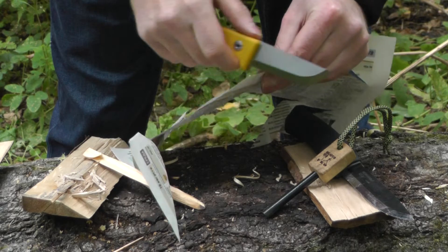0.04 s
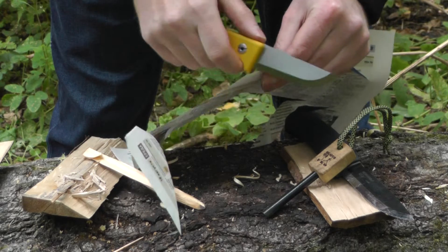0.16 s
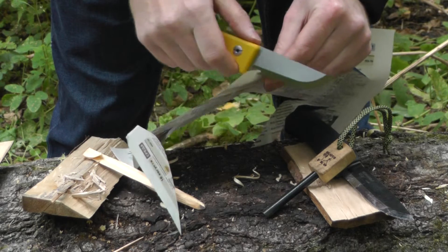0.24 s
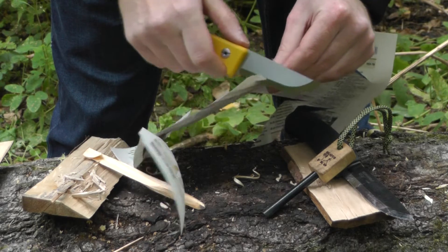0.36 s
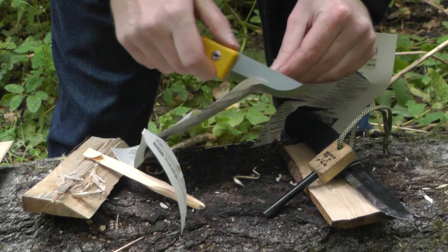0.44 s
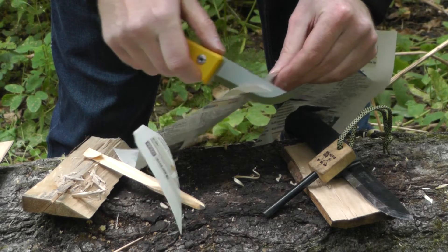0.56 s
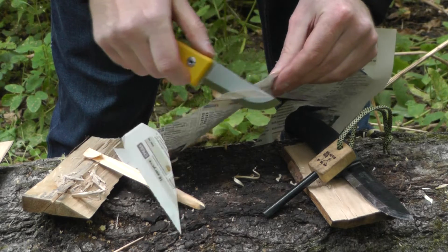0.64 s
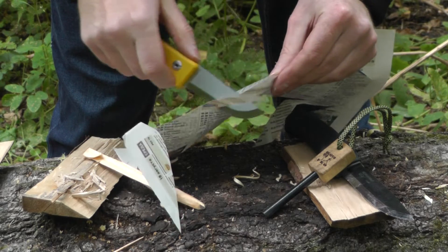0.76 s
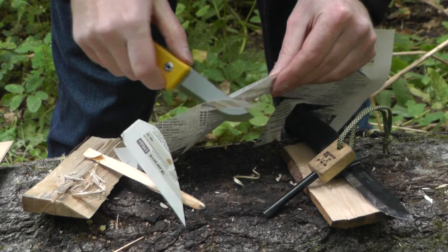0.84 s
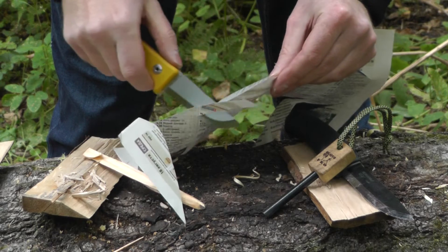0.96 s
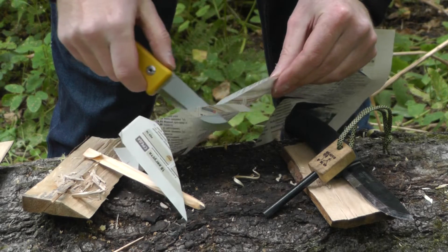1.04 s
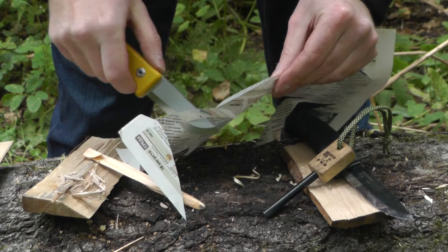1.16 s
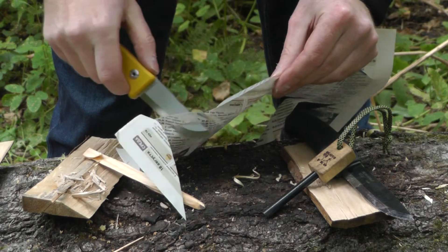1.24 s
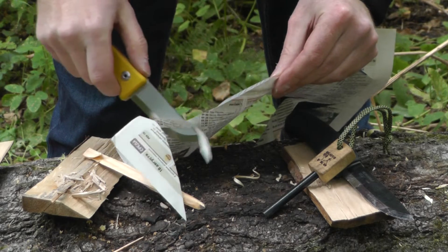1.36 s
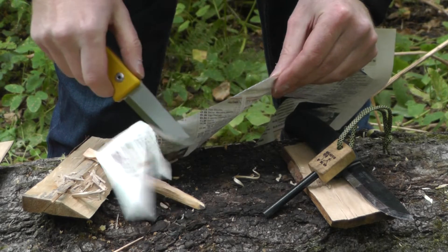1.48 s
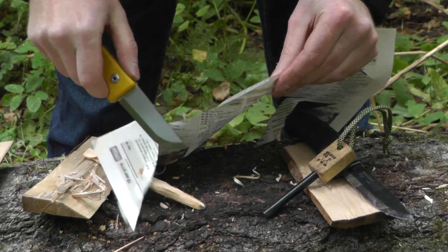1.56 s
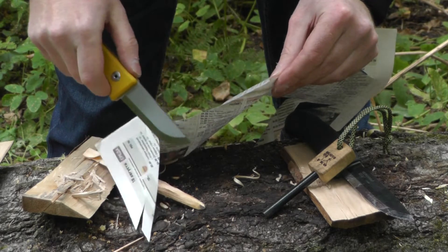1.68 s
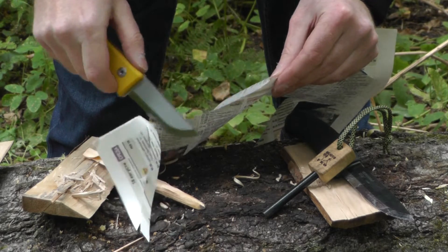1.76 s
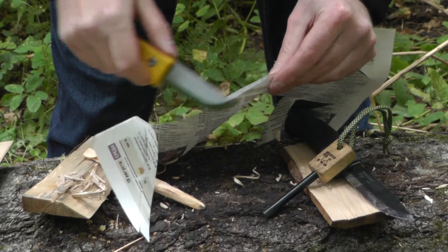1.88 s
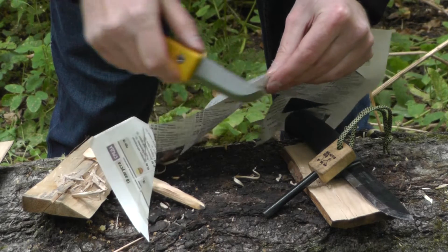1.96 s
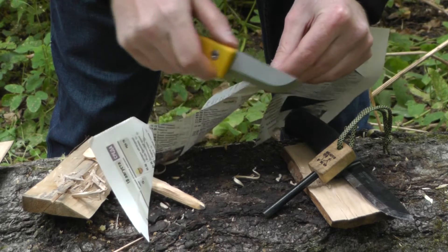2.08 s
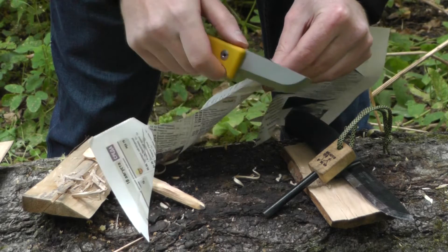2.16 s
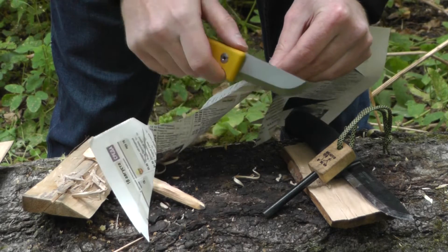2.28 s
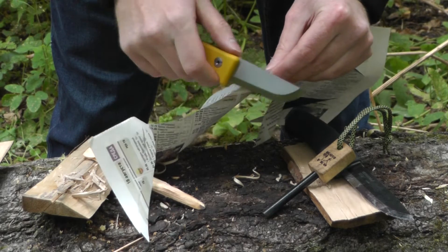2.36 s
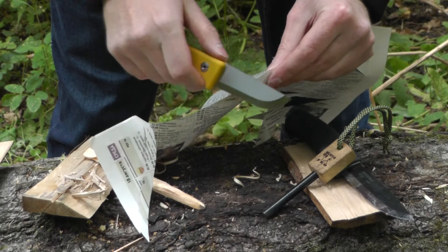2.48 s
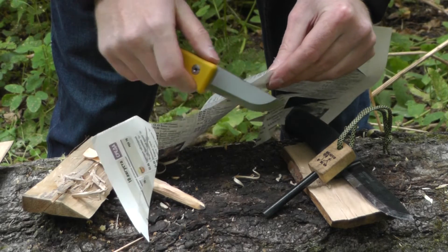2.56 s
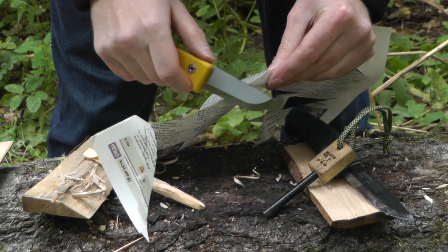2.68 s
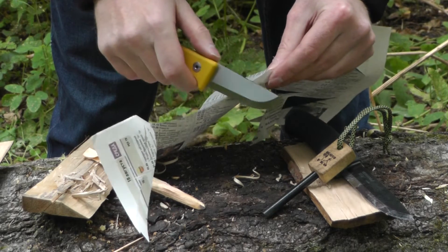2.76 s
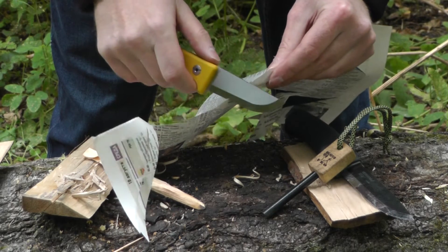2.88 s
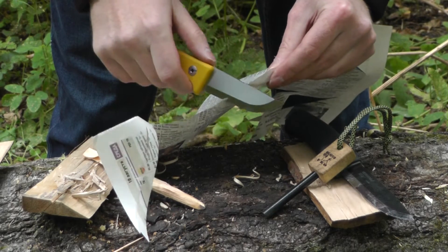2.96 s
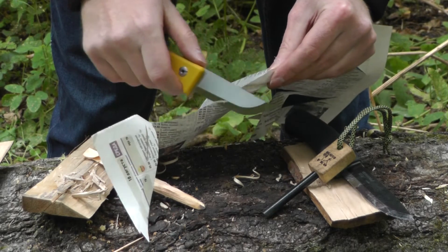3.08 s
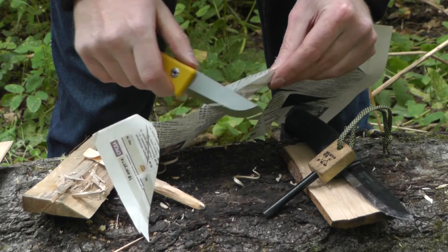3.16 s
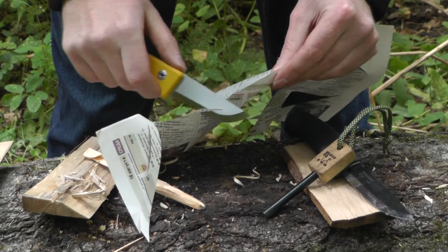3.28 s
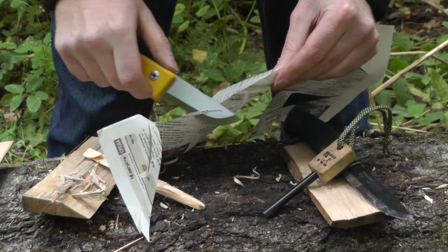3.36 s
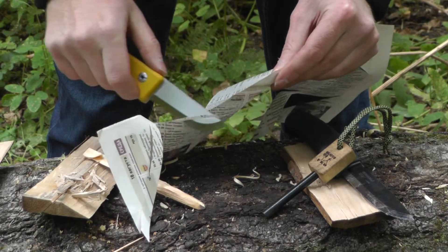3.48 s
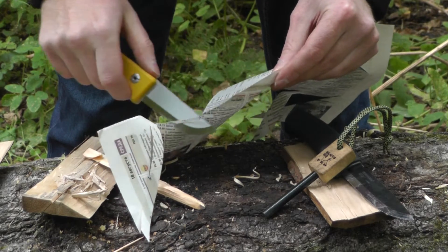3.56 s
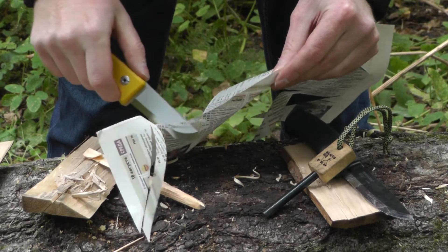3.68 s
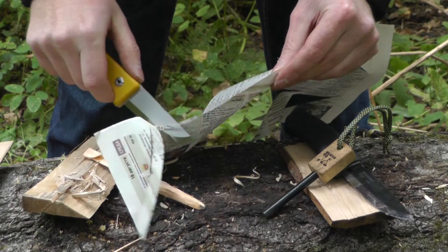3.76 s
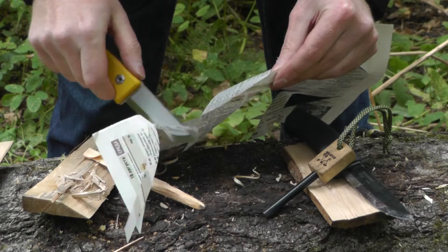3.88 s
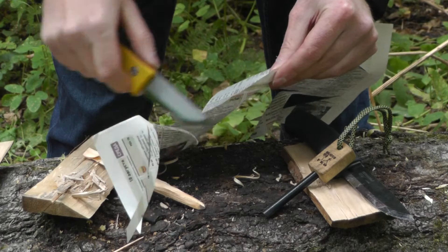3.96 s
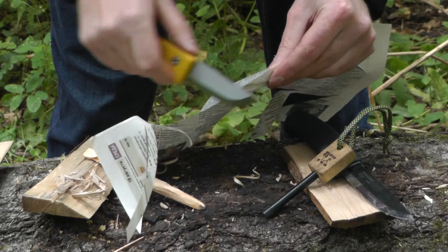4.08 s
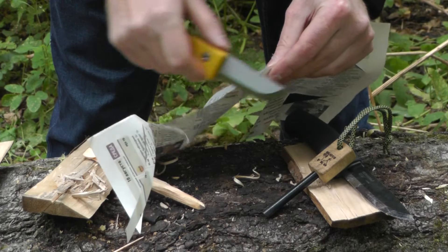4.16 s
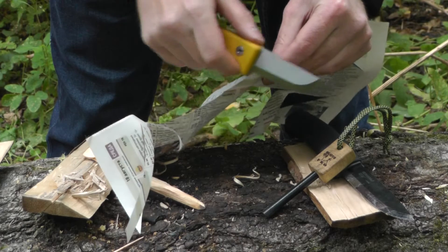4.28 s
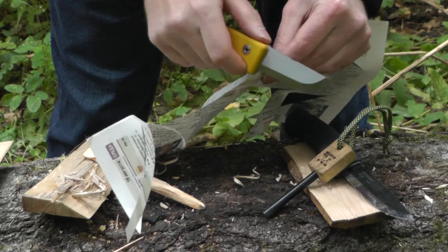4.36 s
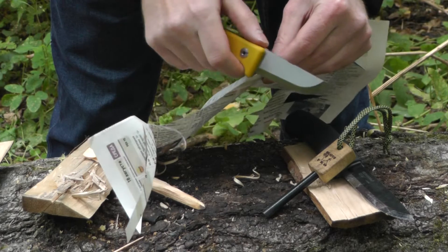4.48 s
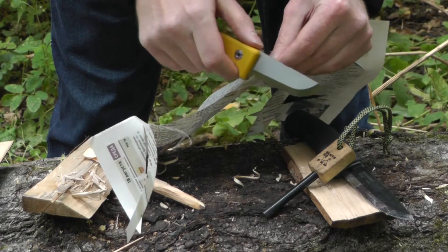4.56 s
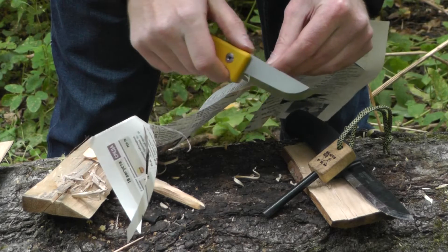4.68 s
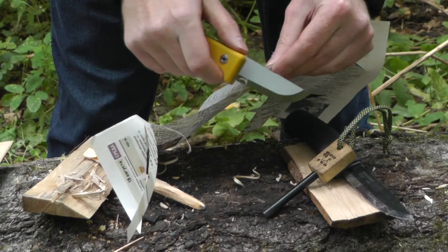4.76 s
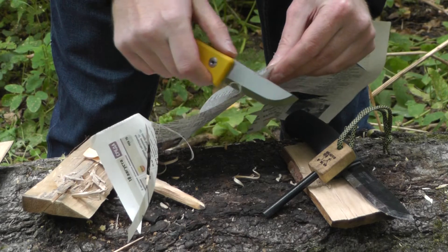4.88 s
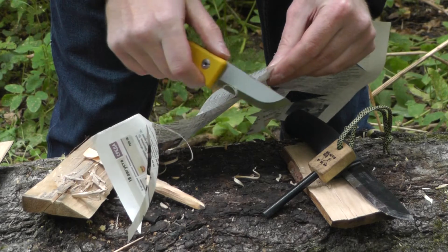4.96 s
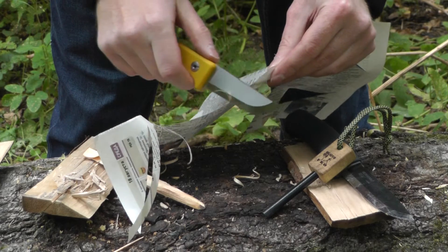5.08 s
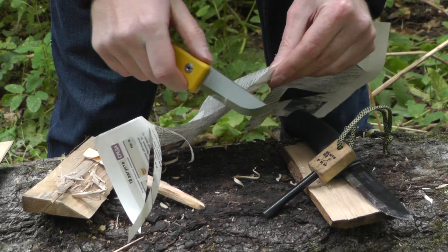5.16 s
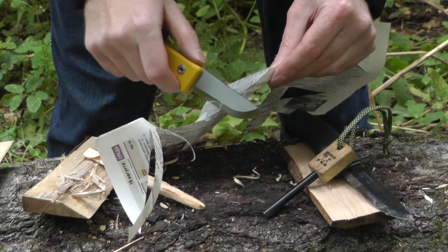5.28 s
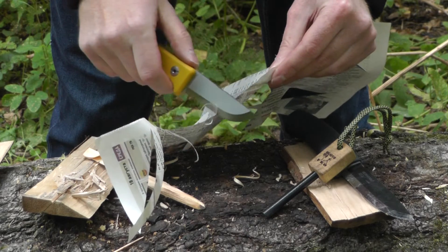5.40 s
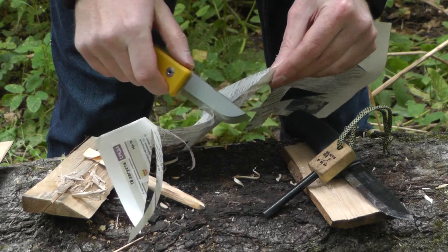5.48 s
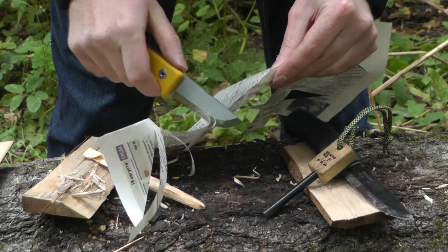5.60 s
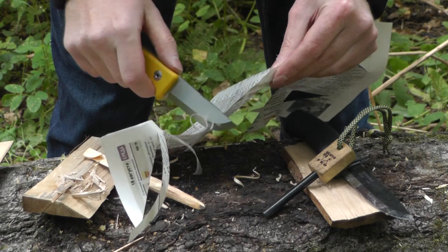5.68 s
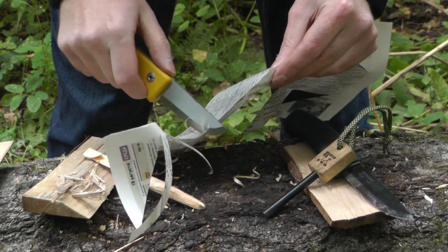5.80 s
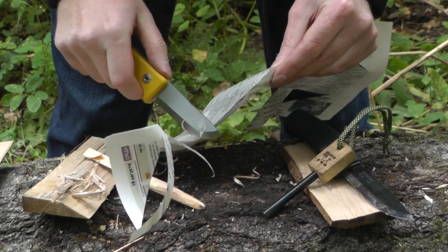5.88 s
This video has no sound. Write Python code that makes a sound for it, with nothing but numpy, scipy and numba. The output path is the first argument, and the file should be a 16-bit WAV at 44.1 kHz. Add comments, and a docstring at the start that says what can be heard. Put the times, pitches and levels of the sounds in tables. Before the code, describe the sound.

Quiet woodland air, a soft even low rush with a barely audible hum, runs throughout. Close and dry, a knife begins slicing a held sheet of newsprint at about 0.25 s: a thin, fine hiss grows into a fuller, grainy rasp, its hollow colouring sweeping upward, with snaps near 0.9 s and a crackling rip from 1.3 to 1.6 s. Faint crinkles and rustling follow as the knife returns. A short rip catches at 2.6 s, then a dry buckling tick at 2.85 s. The second stroke, 2.9 to 3.9 s, starts promptly and swells faster, with a strong rip at 3.5 s and a cluster of crisp snaps around 3.8 s. Light creasing and rustle fill the gap until 4.4 s. The third stroke fades in slowly, softer, finer and more hissy, with slight surges at 5.1 and 5.6 s, continuing to the end around 6 s.

```python
"""Knife slicing newsprint

A sharp knife slices strips off a hand-held sheet above a log, in quiet woodland. Random fibre breaks
excite the sheet's resonances, fuller as the cut leaves the fingers; delayed paths that shorten as the
blade sinks sweep a comb upward. Single snaps are impulse responses; crinkles and a faint rustle are
coloured bursts of breaks, and one buckle ticks. The air is filtered noise with a faint, wavering hum."""
import sys
import numpy as np
from scipy import signal
from scipy.fft import rfft, irfft, next_fast_len
from scipy.io import wavfile
from scipy.ndimage import uniform_filter1d
from numba import njit

SR = 44100
rng = np.random.default_rng(int(sys.argv[2]) if len(sys.argv) > 2 else 0)


def log_audio(samples):
    """Write samples as a 16-bit WAV file to the path given in sys.argv[1]."""
    # one column per channel
    frames = np.atleast_2d(samples).T
    # limit to full scale, then quantise
    limited = np.clip(frames, -1, 1)
    pcm = np.round(limited * 32767).astype(np.int16)
    wavfile.write(sys.argv[1], SR, pcm)


N = 261505
TIME = np.arange(N) / SR


def undb(db):
    """Logarithmic level: decibels to amplitude gain."""
    return 10 ** (np.asarray(db) / 20)


def unit(x):
    """Normalisation of a signal to rms 1."""
    return x / np.sqrt(np.mean(x ** 2) + 1e-18)


def colour(x, points):
    """Minimum-phase filtering: the cepstrum is folded to give a causal response with levels (f/Hz, level/dB)."""
    size = 4096
    hz, db = np.transpose(points)
    log_hz = np.log(np.fft.rfftfreq(size, 1 / SR) + 1)
    log_gain = np.log(undb(np.interp(log_hz, np.log(hz), db)))
    cepstrum = irfft(log_gain)
    cepstrum[1:size // 2] *= 2
    cepstrum[size // 2 + 1:] = 0
    response = irfft(np.exp(rfft(cepstrum)))
    return signal.fftconvolve(x, response)[:len(x)]


def ring(x, hz, width):
    """Simple resonance: one mode with gain 1 at its centre, width in Hz."""
    return signal.lfilter(*signal.iirpeak(hz, hz / width, fs=SR), x)


@njit
def glide_ring(x, hz, width):
    """Time-varying resonance: a state-variable mode whose centre moves from sample to sample."""
    y, band, low = np.empty(len(x)), 0., 0.
    for i in range(len(x)):
        g, k = np.tan(np.pi * hz[i] / SR), width / hz[i]
        v = (band + g * (x[i] - low)) / (1 + g * (g + k))
        band, low, y[i] = 2 * v - band, low + 2 * g * v, k * v
    return y


def below(x, hz):
    """Zero-phase low-pass filtering: the part of x under hz, in phase with x."""
    return signal.sosfiltfilt(signal.butter(3, hz, fs=SR, output="sos"), x)


def walk(rate, size=8192):
    """Slow random modulation: Gaussian levels drawn rate times a second, joined by slopes; rms 1."""
    k = max(int(SR / rate), 2)
    held = rng.standard_normal(size)[np.arange(N) // k % size]
    return unit(uniform_filter1d(held, k))


def stick_slip(rate, even_s=0.02):
    """Stick-slip friction: quick swings of the cutting force about a steady local average."""
    force = walk(rate)
    return unit(force - uniform_filter1d(force, int(even_s * SR)))


def fibres(rate, spread_db, bunch_db, bunch_rate):
    """Random impulsive excitation: breaks of either sign vary with toughness and with the edge's slip."""
    breaks = rng.random(N) < rate / SR
    toughness = np.minimum(rng.exponential(size=N), 4.5)
    catch = np.minimum(stick_slip(bunch_rate), 1.7)
    strength = undb(spread_db * toughness + bunch_db * catch)
    return unit(breaks * rng.choice([-1, 1], N) * strength)


def impulse(size=1024):
    """Impulsive excitation: one single-sample push."""
    return signal.unit_impulse(size)


def envelope(start, end, attack, release):
    """Amplitude envelope: linear rise, hold and fall to silence, in seconds."""
    return np.clip(np.minimum((TIME - start) / attack, (end - TIME) / release), 0, 1)


def add(out, s, sound):
    """Superposition: mix a sound in at time s."""
    i = int(s * SR)
    out[i:i + len(sound)] += sound[:N - i]


# Relative spectrum of the woodland air: f/Hz, level/dB
AIR_SPECTRUM = [(20, -24.5), (65, -12), (120, -11), (180, -11), (300, -9), (450, -5.5), (650, -2.5),
                (930, -7), (1250, -16), (1770, -22.5), (2300, -25), (3700, -28.5), (7000, -34.5),
                (15800, -38)]
AIR_DB = -49
HUM_HZ, HUM_DB = 250, -68.5


def woodland():
    """Broadband noise and frequency modulation: an even rush of distant air with a wavering hum in it."""
    rush = unit(colour(rng.standard_normal(N), AIR_SPECTRUM)) * undb(AIR_DB + 0.25 * walk(3.73))
    hum_hz = HUM_HZ * (1 + 0.0067 * walk(7.6))
    hum = np.sin(2 * np.pi * np.cumsum(hum_hz) / SR)
    return rush + undb(HUM_DB) * unit(hum)


# Flurries of creases as the sheet crinkles and scuffs:
# t/s, level/dB, length/s, ring f/Hz, ring level relative to the creases/dB
CRINKLE_EVENTS = [(0.152, -64, 0.062, 7600, 19), (1.57, -50.5, 0.077, 2670, -10),
                  (1.619, -57, 0.036, 2600, -15), (1.811, -46, 0.016, 6200, -9),
                  (1.932, -55, 0.12, 2300, -27), (1.983, -46, 0.019, 2010, -20),
                  (2.204, -56.5, 0.066, 5700, -24), (2.26, -53, 0.028, 5700, -19),
                  (2.445, -46.5, 0.0027, 4170, -14), (2.6, -48, 0.012, 2660, -10),
                  (2.753, -47.5, 0.027, 2130, -8), (2.869, -54, 0.017, 2420, -8),
                  (4.147, -60, 0.06, 3740, -1), (4.234, -45.5, 0.022, 2600, -30),
                  (4.291, -50.5, 0.02, 3720, -8), (4.311, -48.5, 0.032, 2030, -11),
                  (4.572, -47, 0.072, 1910, 23), (4.606, -49.5, 0.096, 8500, 3)]
# Relative spectrum of creasing paper, shared with the rustle: f/Hz, level/dB
CREASE_SPECTRUM = [(400, -8), (1300, -9), (2000, 5), (2750, 4.5), (3300, 1.5), (4300, 4), (5400, -4),
                   (6500, -4.5), (10000, -10.5), (12000, -14.5), (16000, -18)]


def crinkles(ring_width_hz=380):
    """Buckling cascades: short flurries of creases, each exciting a resonance of its own."""
    out = np.zeros(N)
    breaks = fibres(rate=1600, spread_db=1.5, bunch_db=2.5, bunch_rate=300)
    creases = colour(breaks, CREASE_SPECTRUM)
    for s, db, length, hz, ring_db in CRINKLE_EVENTS:
        start, count = int(s * SR), max(int(length * SR), 64)
        flurry = creases[start:start + count]
        flurry = unit(flurry) + undb(ring_db) * unit(ring(flurry, hz, ring_width_hz))
        rise = np.minimum(np.arange(count) / 30, 1)
        fall = np.cos(np.linspace(0, np.pi / 2, count)) ** .5
        add(out, s, undb(db) * unit(flurry * rise * fall))
    return out


# Knife strokes; depth runs from 0 at the fingers to 1 at the foot of the sheet:
# start t/s, end t/s, attack/s, starting level/dB, swell over the stroke/dB, edge hiss offset/dB,
# wait from the stroke's start until the blade sinks/s, sinking speed/(depth/s),
# added slackness (scale 0-1), strip ring offset/dB, finest hiss offset/dB, far path's delay at depth 0/ms
KNIFE_STROKES = [(0.24, 1.519, 0.35, -41.5, 8.5, .5, 0.32, 0.77, 0.05, -2, 0.5, 0.571),
                 (2.908, 3.888, 0.056, -40.5, 8.5, .5, 0.19, 1.17, 0.09, -0.5, -9, 0.644),
                 (4.424, 6.001, 0.87, -43.5, 1.5, -2.5, 0.1, .26, -.1, 2, 6.5, 0.538)]


def blade():
    """Kinematics: the edge bites gradually; after a wait from the stroke's start it sinks at constant speed."""
    depth, bite = np.zeros(N), np.ones(N)
    grip = np.tile(KNIFE_STROKES[0][8:], (N, 1))  # each stroke has its own grip on the sheet
    for stroke in KNIFE_STROKES:
        (start, end, attack), (wait, speed) = stroke[:3], stroke[6:8]
        cutting = (TIME >= start) & (TIME < end)
        t = TIME[cutting] - start
        depth[cutting] = np.clip(speed * (t - wait), 0, 1)
        bite[cutting] = np.minimum(t / attack, 1) ** 2
        grip[cutting] = stroke[8:]
    return depth, bite, *grip.T


# Short rips as the blade catches: start t/s, end t/s, level/dB, edge hiss offset/dB
BLADE_CATCHES = [(0.255, 0.33, -46, 3.5), (0.874, 0.968, -40, 1.5), (1.528, 1.618, -36.5, 0.5),
                 (2.606, 2.725, -38, -2.5), (3.24, 3.395, -42, -3), (3.503, 3.53, -27, -2),
                 (3.762, 3.85, -30.5, -7), (4.502, 4.7, -53.5, 0), (5.08, 5.23, -45, -9),
                 (5.56, 5.63, -43, -1)]
STROKE_RELEASE_S = 0.034
CATCH_ATTACK_S, CATCH_RELEASE_S = .014, .032


def efforts():
    """Driving force: gain over time and hiss offset of each stroke and catch; strokes swell as the hand leans in."""
    for start, end, attack, db, swell_db, hiss_db, *_ in KNIFE_STROKES:
        progress = np.clip((TIME - start) / (end - start), 0, 1)
        yield envelope(start, end, attack, STROKE_RELEASE_S) * undb(db + swell_db * progress), hiss_db
    for start, end, db, hiss_db in BLADE_CATCHES:
        yield envelope(start, end, CATCH_ATTACK_S, CATCH_RELEASE_S) * undb(db), hiss_db


# The paper's answer against cut depth, before each stroke's offsets: depth (0-1), slackness (0-1),
# flexing level/dB, edge hiss level/dB, finest hiss level/dB, strip ring level/dB
PAPER_RESPONSE = [(0, 0.38, -10.5, -2.5, 12, -13), (.22, 0.16, -5.5, -1, 6.5, -14),
                  (.35, 0.55, -2, -4, -5, -16.5), (.55, 0.61, -2, -6, -8, -16),
                  (1, 0.68, -7.5, -12, 6, -10.5)]


def paper_at(depth):
    """Interpolated boundary conditions: slackness, flexing, edge hiss, finest hiss and strip ring at a depth."""
    depths, *columns = np.transpose(PAPER_RESPONSE)
    return [np.interp(depth, depths, column) for column in columns]


# Relative response of the sheet, taut near the fingers: f/Hz, level/dB
TAUT_RING = [(200, -32), (600, -9.5), (1100, 6), (1650, -12.5), (2500, 1.5), (3300, -5.5), (4250, 3),
             (4900, -7.5), (5500, -7.5), (6300, 2), (8000, -2.5), (9800, -0.5), (11800, -20),
             (16000, -33.5)]
# Relative response of the sheet hanging slack: f/Hz, level/dB
SLACK_RING = [(200, -43), (380, -20), (550, -5.5), (700, -1.5), (880, -2.5), (1500, 0), (2400, -3),
              (3300, -6), (3850, 0.5), (4400, -8.5), (5100, -12.5), (6500, -18.5), (10500, -7),
              (12200, -17.5)]
STRIP_WIDTH_HZ = 600  # of each of two resonators in cascade


def strip_band(push, hz):
    """Cascaded resonance: two equal gliding resonators leave one clear band."""
    once = glide_ring(push, hz, STRIP_WIDTH_HZ)
    return unit(glide_ring(once, hz, STRIP_WIDTH_HZ))


def sheet(push, slack, strip_hz, strip_db, overtone=1.915, overtone_db=-7):
    """Modal superposition: taut and slack responses blend; the strip adds a wandering band and its overtone."""
    broad = (1 - slack) * unit(colour(push, TAUT_RING)) + slack * unit(colour(push, SLACK_RING))
    strip = strip_band(push, strip_hz)
    upper = strip_band(push, overtone * strip_hz)
    return unit(broad + undb(strip_db) * (strip + undb(overtone_db) * upper))


def bending(x):
    """Modal fluctuation: as the sheet bends, its many resonances swell and fade independently."""
    for hz in np.arange(1500, 15000, 750):
        x = x + (undb(2.3 * walk(8)) - 1) * ring(x, hz, 250 + hz / 30)
    return x


# Two short sound paths round the sheet: delays at depth 0, shortening per unit depth, amplitude shares
NEAR_MS, NEAR_SHRINK_MS, FAR_SHRINK_MS = .405, .21, .17
NEAR_SHARE, FAR_SHARE = .44, .24
TREMOR_MS, TREMOR_PER_S = .009, 6


def detours(x, depth, bite, far_ms):
    """Comb interference: sound bent round the sheet arrives late and phase-turned; shrinking lags sweep it upward."""
    turn = np.exp(-1j * np.pi / 4)  # one eighth of a cycle
    bent = np.real(signal.hilbert(x, next_fast_len(N))[:N] * turn)
    tremor_ms = TREMOR_MS * walk(TREMOR_PER_S)  # the hands are never quite still
    near_ms = NEAR_MS - NEAR_SHRINK_MS * depth + tremor_ms
    far_lag_ms = far_ms - FAR_SHRINK_MS * depth + tremor_ms
    near = np.interp(TIME - near_ms / 1000, TIME, bent)
    far = np.interp(TIME - far_lag_ms / 1000, TIME, bent)
    return x + bite * (NEAR_SHARE * near + FAR_SHARE * far)


BRIGHTEST_TICK_HZ, TICK_SPREAD_DB = 10500, 3


def pinpricks(rate=90, hz=7500, width_hz=4500):
    """Sparse impulse excitation: now and then a stiff fibre parts on the edge with a tiny bright tick."""
    strength = undb(TICK_SPREAD_DB * np.minimum(rng.exponential(size=N), 3))
    ticks = (rng.random(N) < rate / SR) * strength
    bright = ring(ring(ticks, hz, width_hz), hz, 2 * width_hz)
    return unit(below(bright, BRIGHTEST_TICK_HZ))


# Wandering ring of the cut strip, one list per slice: t/s, f/Hz
STRIP_PITCH = [
    [(0.35, 2450), (0.564, 2760), (1.07, 1990), (1.5, 2440)],
    [(2.95, 2500), (3.108, 2400), (3.13, 2420), (3.35, 2560)],
    [(5.12, 2050), (5.218, 2380), (5.904, 2460), (5.93, 2470)],
]
UNBITTEN_RING_DB = -15  # offset to the strip's ring before the edge has bitten
JUDDER_DB, JUDDER_PER_S = .67, 130
TOUGHNESS_DB, TOUGHNESS_PER_S = .5, 35


def slicing():
    """Source-filter principle: one stream of fibre breaks drives the sheet's flexing, ring and edge hiss."""
    depth, bite, extra_slack, extra_ring_db, extra_fine_db, far_ms = blade()
    slack, flex_db, edge_db, fine_db, strip_db = paper_at(depth)
    strip_hz = np.interp(TIME, *np.transpose(np.vstack(STRIP_PITCH)))
    push = fibres(rate=6000, spread_db=2.0, bunch_db=-0.5, bunch_rate=290)
    push = push * undb(JUDDER_DB * stick_slip(JUDDER_PER_S))
    ring_db = strip_db + extra_ring_db + UNBITTEN_RING_DB * (1 - bite)
    ringing = sheet(push, np.clip(slack + extra_slack, 0, 1), strip_hz, ring_db)
    paper = detours(bending(ringing), depth, bite, far_ms)

    low, body, coarse = below(paper, 1900), below(paper, 5000), below(paper, 11000)
    treble = coarse - body + undb(fine_db + extra_fine_db) * (paper - coarse)
    # each band is held to an even strength over 60 ms before the efforts shape it
    span = int(.06 * SR)
    bands = (low, body - low, treble)
    flex, middle, hiss = (b / np.sqrt(uniform_filter1d(b ** 2, span) + 1e-12) for b in bands)
    hiss = hiss * undb(1.0 * stick_slip(190)) + undb(-7.5) * pinpricks()  # the edge bites unevenly

    # strokes and catches add in power
    body_power, hiss_power = 0, 0
    for gain, hiss_db in efforts():
        body_power = body_power + gain ** 2
        hiss_power = hiss_power + (gain * undb(hiss_db)) ** 2
    grain = undb(TOUGHNESS_DB * walk(TOUGHNESS_PER_S))  # the paper is not equally tough everywhere
    body_sound = np.sqrt(body_power) * (middle + undb(flex_db) * flex)
    hiss_sound = np.sqrt(hiss_power) * undb(edge_db) * hiss
    return grain * (body_sound + hiss_sound)


# Tough fibres and creases that give at once: t/s, peak-to-peak level/dB, crispness (gain near 6.3 kHz)/dB
SNAP_EVENTS = [(0.893, -10, 4), (0.904, -10, 3), (1.314, -11, 6), (1.449, -12, 3), (1.463, -12, 2),
               (1.524, -19, 9), (1.547, -11, 11), (1.553, -13, 11), (1.587, -13, -3), (1.815, -28, 0),
               (1.985, -24, -2), (2.623, -17, 5), (2.673, -14, -4), (3.01, -13, 9), (3.211, -16.5, 5),
               (3.511, -11, -7), (3.796, -11, 1), (3.822, -11.5, 3), (3.843, -13, 4), (3.855, -16, 3),
               (3.871, -17, 5), (3.88, -21, 4), (3.888, -23, 1), (4.232, -33, 3), (4.243, -29, 3)]


def snaps(shiver=0.14, shiver_s=0.0028, shiver_hz=5000):
    """Impulse response: a tough fibre gives way at once and the sheet shivers on briefly, lower down."""
    out = np.zeros(N)
    t = TIME[:len(impulse())]
    slack = paper_at(blade()[0])[0]
    for s, db, crisp_db in SNAP_EVENTS:
        shivering = below(rng.standard_normal(len(t)), shiver_hz) * np.exp(-t / shiver_s)
        push = impulse() + shiver * shivering
        push = push + (undb(crisp_db) - 1) * ring(push, 6300, 4900)
        snap = colour(push, SLACK_RING if slack[int(s * SR)] > .45 else TAUT_RING)
        add(out, s, snap * undb(db) / np.ptp(snap))
    return out


# Handling of the sheet while the knife is brought back: start t/s, end t/s, base level before fluctuation/dB
HANDLING_SPANS = [(1.625, 2.167, -60), (2.193, 2.513, -65), (2.72, 2.762, -52), (3.91, 4.467, -62)]
RUSTLE_SPREAD_DB, RUSTLES_PER_S = 2.5, 45


def rustle(fade_s=0.013):
    """Amplitude-modulated crease noise: faint creases come and go as the sheet shifts in the fingers."""
    breaks = fibres(rate=1400, spread_db=-0.5, bunch_db=3.5, bunch_rate=180)
    creases = unit(colour(breaks, CREASE_SPECTRUM))
    held = sum(undb(db) * envelope(start, end, fade_s, fade_s) for start, end, db in HANDLING_SPANS)
    return held * creases * undb(RUSTLE_SPREAD_DB * np.minimum(walk(RUSTLES_PER_S), 2))


# Relative response of the buckling edge: f/Hz, level/dB
BUCKLE_SPECTRUM = [(300, -19), (900, 0.5), (1400, 1.5), (1950, -8), (2700, 6), (3600, -11), (4600, -10),
                   (6000, -25), (16000, -42)]
BUCKLE_S, BUCKLE_DB = 2.8485, -18.5  # time and peak level


def buckle():
    """Snap-through instability: as the blade is set on it, the taut edge flips with a dry tick and faint flutter."""
    out = np.zeros(N)
    t = TIME[:len(impulse())]
    push = impulse() + 0.026 * rng.standard_normal(len(t)) * np.exp(-t / 0.0058)
    tick = colour(push + 1.2 * ring(push, 2200, 500), BUCKLE_SPECTRUM)
    add(out, BUCKLE_S, tick * undb(BUCKLE_DB) / np.abs(tick).max())
    return out


def scene():
    """Linear superposition: knife and paper close by, in the open air."""
    return (woodland() + crinkles() + slicing() + snaps() + rustle() + buckle())[None]


TOP_HZ = 15800


def record(dry):
    """Band limitation: a steep elliptic low-pass removes the top of the spectrum."""
    return signal.sosfilt(signal.ellip(10, .2, 70, TOP_HZ, fs=SR, output="sos"), dry)


dry = scene()
out = record(dry)
log_audio(out)
```